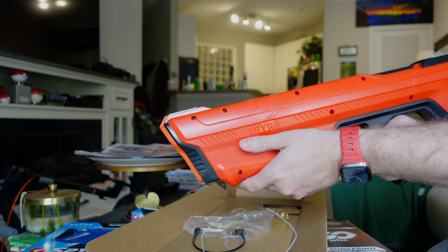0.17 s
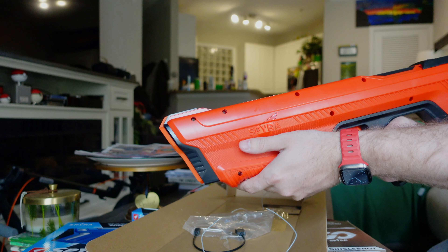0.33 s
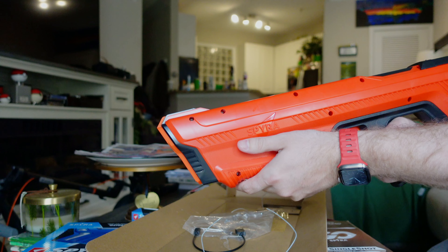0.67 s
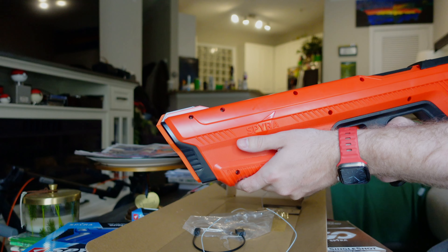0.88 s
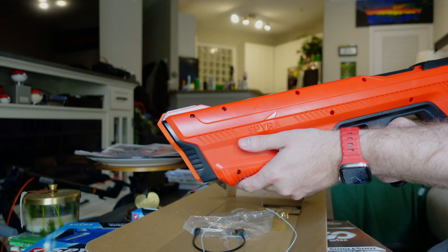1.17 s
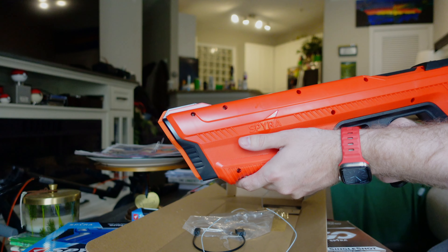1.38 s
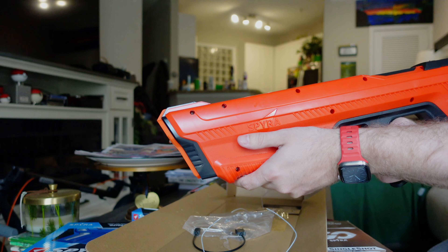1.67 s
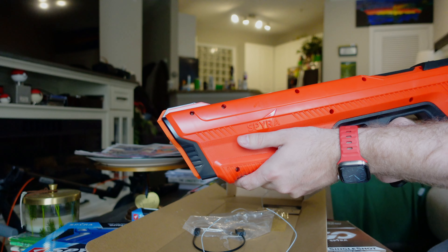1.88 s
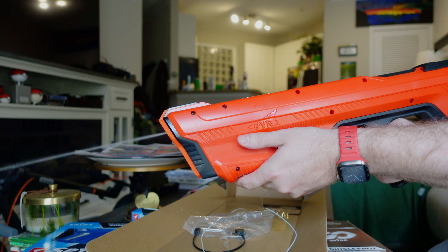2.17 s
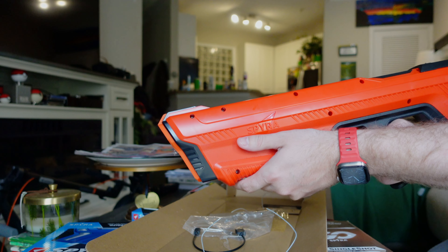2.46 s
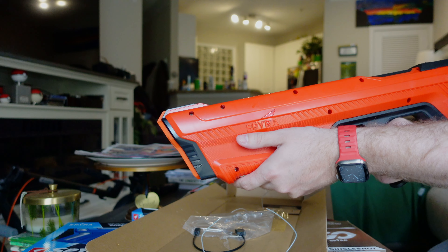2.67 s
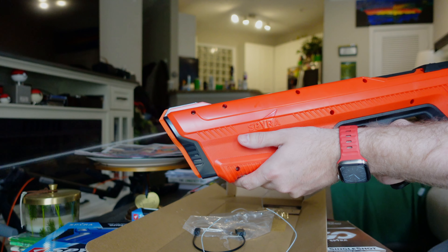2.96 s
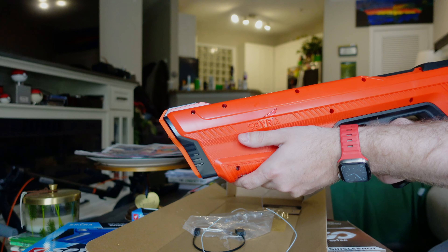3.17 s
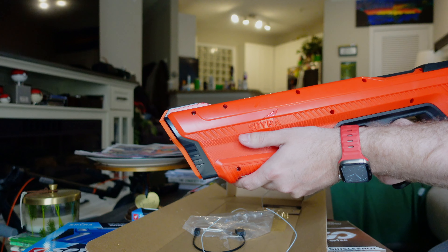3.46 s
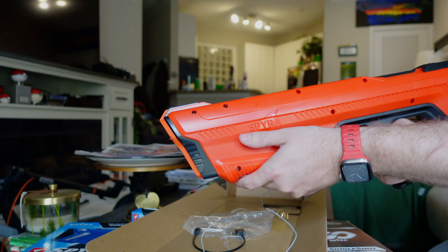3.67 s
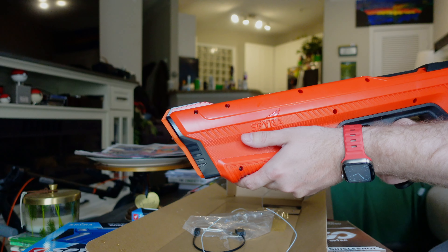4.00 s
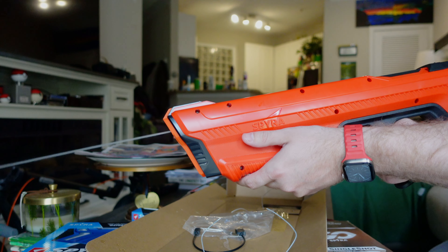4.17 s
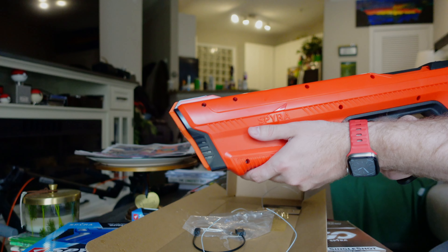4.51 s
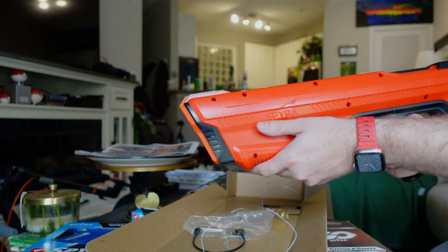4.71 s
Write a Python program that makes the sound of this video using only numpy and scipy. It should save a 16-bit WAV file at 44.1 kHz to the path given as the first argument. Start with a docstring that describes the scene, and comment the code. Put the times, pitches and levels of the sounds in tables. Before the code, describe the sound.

An electric toy water gun fires five separate shots indoors, each a rising motor whir, sharp plastic clack, racing gears and brief water spurt.

```python
"""A thin ring from an earlier shot dies away over still air and mains hum, then a trigger clicks close by.
An electric water gun fires five shots in a living room, near a microphone with a limiter.
Each shot is one turn of a geared cam: the motor winds up against a spring, the valve snaps open, the unloaded
gears race and throb, then take up the load again and stop with a clack.
The jet, a little farther off, hisses and drums on a hollow target: random impacts through filters."""
import sys
import numpy as np
from scipy import signal
from scipy.fft import rfft, irfft, next_fast_len
from scipy.io import wavfile
from scipy.ndimage import uniform_filter1d, minimum_filter1d, map_coordinates

SR = 44100
rng = np.random.default_rng(int(sys.argv[2]) if len(sys.argv) > 2 else 0)


def store_wav(level_fs):
    """Save 16-bit WAV to argv[1]."""
    pcm = np.round(np.clip(np.atleast_2d(level_fs), -1, 1) * 32767)
    wavfile.write(sys.argv[1], SR, pcm.T.astype(np.int16))


N = 213752
RUN_S, RING_S = .594, .3  # one turn of the cam; length of each short knock


def amp(db):
    """Decibels to gain."""
    return 10 ** (np.asarray(db) / 20)


def unit(x):
    """Scale to rms 1."""
    return x / np.sqrt(np.mean(x ** 2) + 1e-20)


def along(points, hz):
    """Read (frequency [Hz], value) points on a log frequency axis."""
    f, v = np.transpose(points)
    return np.interp(np.log(hz + 1), np.log(f), v)


def clock(seconds):
    """Sample times from zero."""
    return np.arange(int(seconds * SR)) / SR


def add(track, s, x):
    """Mix x into the track at s seconds."""
    at = max(0, round(s * SR))
    track[at:at + len(x)] += x[:max(0, len(track) - at)]


def wobble(rate, t):
    """A smooth random curve, rate knots a second."""
    return map_coordinates(rng.standard_normal(int(t[-1] * rate) + 4), [t * rate + 1])


def gate(t, rise, fall):
    """Soft ends for a sound that lasts the times t."""
    return np.clip(t / rise, 0, 1) * np.clip((t[-1] - t) / fall, 0, 1)


def settle(t, s, lag):
    """0 to 1 from s seconds on, as a flywheel follows a new load."""
    return 1 - np.exp(-np.maximum(t - s, 0) / lag)


def ease(t, s, length):
    """A smooth step from 0 to 1 that begins at s seconds."""
    return np.sin(np.pi / 2 * np.clip((t - s) / length, 0, 1)) ** 2


def colour(x, spectrum, peaks=(), size=4096):
    """Causal filter of energy 1: a broad spectrum with resonances standing on it."""
    hz = np.fft.rfftfreq(size, 1 / SR)
    resonances = sum(amp(db) / (1 + (2 * (hz - c) / w) ** 2) for c, w, db in peaks)
    gain = amp(along(spectrum, hz)) * (1 + resonances)
    # folding the cepstrum gives minimum phase, so the response starts at once
    cepstrum = irfft(np.log(gain + 1e-6))
    cepstrum[1:size // 2] *= 2
    cepstrum[size // 2 + 1:] = 0
    response = irfft(np.exp(rfft(cepstrum)))
    return signal.fftconvolve(x, response / np.linalg.norm(response))[:len(x)]


# mains hum: (frequency [Hz], rms level [dB])
HUM = [(120, -65), (179, -58), (299, -57), (420, -69)]
# still air in the place: (frequency [Hz], relative density [dB per Hz])
STILL_AIR = [(25, -15), (100, -13), (200, -9), (400, -6), (800, -12), (1300, -20), (2000, -25), (4000, -32),
             (11000, -38), (16000, -40)]


def background():
    """Still air as filtered noise, and the hum of household appliances as steady sines."""
    t = np.arange(N) / SR
    hum = sum(amp(db) * np.sqrt(2) * np.sin(2 * np.pi * (hz * t + rng.random())) for hz, db in HUM)
    return hum + amp(-50) * unit(colour(rng.standard_normal(N), STILL_AIR))


# decay of the living room: (frequency [Hz], t60 [s])
ROOM = [(150, 0.12), (600, 0.3), (1600, 0.43), (5000, 0.33), (8000, 0.36), (15000, 0.15)]


def room(x):
    """The living room's diffuse answer, a decaying noise tail; the upper middle lingers longest."""
    hz, t, z = signal.stft(rng.standard_normal(int(.7 * SR)), SR, nperseg=256)
    decay = amp(-60 * t / along(ROOM, hz)[:, None])
    tail = signal.istft(z * decay, SR, nperseg=256)[1]
    tail = tail * np.clip(np.arange(len(tail)) / SR / 0.029, 0, 1)  # the tail builds up gradually
    return signal.fftconvolve(x, tail / np.linalg.norm(tail))[:N]


def envelope(shape, t):
    """Gain of a part that waits, rises, holds and dies away."""
    delay, attack, hold, fall_db_per_s, db = shape
    falling_s = np.maximum(t - delay - attack - hold, 0)
    return ease(t, delay, attack) * amp(db - fall_db_per_s * falling_s)


# the parts of a jet, timed from the valve: (delay [s], attack [s], hold [s], fall [dB per s], level [dB])
GUSHING = (.006, .015, .09, 110, -22)
SPITTING = (.004, .016, .016, 220, -10.5)
SPRAYING = (.02, .03, .16, 80, -18)
DRUMMING = (.07, .025, .17, 125, -10)
# gush at the nozzle, first spit, spray, hollow target: (frequency [Hz], relative density [dB per Hz])
GUSH = [(40, -30.5), (200, -13.5), (350, -4.5), (750, 3), (1100, 0), (1600, 0), (3200, -5.5), (4500, -23.5),
        (8000, -32), (15000, -55.5)]
MIST = [(1000, -29.5), (3000, 1), (4500, 1.5), (5900, -8), (7500, 2), (11000, -3), (15000, -5.5),
        (16000, -24)]
SPRAY = [(400, -31), (1200, 8), (2800, 8.5), (4500, -13.5), (8000, -8.5), (11000, -0.5), (15500, -46.5)]
TARGET = [(35, -75.5), (60, -20.5), (254, -3), (328, 4.5), (365, 4), (410, 2.5), (692, 0), (884, 1),
          (967, -9), (1060, 1), (1300, -1.5), (1690, -35.5), (2860, -120)]
# resonances of the target: (frequency [Hz], width [Hz], level over the spectrum [dB])
TARGET_MODES = [(322, 35, 2.5), (423, 59, 1), (627, 22, 0), (782, 38, 8), (924, 30, 4), (1092, 36, 2.5)]


def water(slugs_per_s=450, drops_per_s=6000, spatters_per_s=2600, spurt_db=3.5):
    """Water gushes from the nozzle and breaks up: fine drops hiss, then heavy slugs drum on the target."""
    out, t = np.zeros(N), clock(RUN_S)

    def impacts(rate):
        """Random hits, each of its own force, rate a second on average."""
        return unit((rng.random(len(t)) < rate / SR) * rng.standard_normal(len(t)))

    for s, *_, gush_db, spray_db, drum_db in RELEASES:
        spurts = amp(spurt_db * wobble(139.7, t))  # the jet arrives in clumps
        ripple = amp(1.0 * wobble(450, t))
        gush = amp(gush_db) * unit(colour(impacts(drops_per_s) * spurts * ripple, GUSH))
        spray = amp(spray_db) * unit(colour(impacts(spatters_per_s) * spurts, SPRAY))
        spit = amp(spray_db) * unit(colour(impacts(spatters_per_s) * spurts, MIST))
        blows = impacts(slugs_per_s) + 0.38 * impacts(drops_per_s)
        drum = amp(drum_db) * unit(colour(blows * spurts, TARGET, TARGET_MODES))
        jet = gush * envelope(GUSHING, t) + spit * envelope(SPITTING, t)
        jet += spray * envelope(SPRAYING, t) + drum * envelope(DRUMMING, t)
        add(out, s, jet)
    return out


def snap(spectrum, t60):
    """A short plastic contact, decaying filtered noise with peak 1."""
    t = clock(RING_S)
    x = colour(rng.standard_normal(len(t)) * amp(-60 * t / t60), spectrum)
    return x / np.abs(x).max()


def ring(modes, t, attack):
    """Damped modes (frequency [Hz], level [dB], t60 [s]), at new strengths for each blow."""
    sizes_db = rng.normal(0, 1.5, len(modes))
    wave = 0
    for (hz, db, t60), size_db in zip(modes, sizes_db):
        wave = wave + amp(db + size_db - 60 * t / t60) * np.sin(2 * np.pi * hz * t)
    return wave * (1 - np.exp(-t / attack))


# trigger and latch clicks: (time [s], level before click_db or trigger_db [dB])
CLICKS = [(0.073, -30.5), (0.848, -17.5), (1.132, -21.5), (1.954, -24), (2.804, -20.5), (3.588, -21),
          (4.018, -21)]
# contact noise of a click and of a clack: (frequency [Hz], relative density [dB per Hz])
CLICK = [(200, -35), (600, 2.5), (1200, -5.5), (2000, -8.5), (3300, -13.5), (5000, -24), (9500, -33),
         (15000, -42.5)]
CLACK = [(120, -28.5), (200, -18), (636, 0), (864, -5), (1130, 1.5), (1460, -7), (2750, -6), (6080, -24),
         (9210, -23.5), (15000, -51.5)]
# ringing of the trigger, the gun's body and its water tank: (frequency [Hz], level [dB], t60 [s])
TRIGGER = [(590, 0, .07), (690, -3, .05)]
BODY = [(300, -6, .05), (400, -2, .05), (520, 1, .04), (680, -2, .03)]
TANK = [(101, 0, .26), (112, -6, .2), (170, -9, .2), (305, -4, .2), (335, -4, .2)]
# the cam lets the spring go, once a shot: (time [s], valve clack [dB], thump [dB], tank boom [dB],
# cam catch [dB], gush [dB], spray [dB], drumming [dB]); the water plays from it too
RELEASES = [(.313, 13.5, 6, -20, -9, 2.5, -23, -23), (1.365, 14, 5, -17, 1.5, -1, -19.5, -20),
            (2.164, 6.5, -4, -31, -1, -1.5, -7.5, -8), (3.017, 5.5, -6.5, -34, -9.5, 0.5, -10.5, -4),
            (4.214, 8, -22, -38, 6, -2.5, -12.5, -4)]


def knocks(click_db=2, trigger_db=-17, start_db=-14, jolt_db=-30, stop_db=-7, slip_db=-11, slip_s=0.0061):
    """Trigger clicks, blows of valve and cam, and the low recoil of body and tank as damped modes."""
    out, t = np.zeros(N), clock(RING_S)
    clack = lambda: snap(CLACK, t60=0.033)
    for s, db in CLICKS:
        add(out, s, amp(db + click_db) * snap(CLICK, t60=0.028))
        add(out, s, amp(db + trigger_db) * ring(TRIGGER, t, attack=0.00081))
    for s, *_ in SHOTS:  # the gears knock as they start and stop
        add(out, s - .001, amp(start_db) * clack() + amp(jolt_db) * ring(BODY, t, attack=0.0041))
        add(out, s + RUN_S - .008, amp(stop_db) * clack())
    for s, clack_db, thump_db, boom_db, catch_db, *_ in RELEASES:
        add(out, s - slip_s, amp(clack_db + slip_db) * clack())  # the follower slips off the cam's edge
        add(out, s, amp(clack_db) * clack())
        thump = amp(thump_db) * ring(BODY, t, attack=0.0046)
        boom = amp(boom_db) * ring(TANK, t, attack=0.019)
        add(out, s, thump + boom)
        add(out, s + FREE_S, amp(catch_db) * clack())
    return out


# tooth mesh pitch before each shot's trim: as the motor kicks in, cocking, running free, reloading
KICK_HZ, COCK_HZ, FREE_HZ, RELOAD_HZ = 750, 1555, 1910, 1590
SPIN_UP_S, RACE_S, BRAKE_S, BRAKE_HZ = .021, .03, .04, 35
FREE_S, TAKE_UP_S = .187, .095  # the cam runs free this long, then takes up the spring


def mesh_pitch(t, release):
    """The motor winds up, races once the spring is gone, slows under the next load and brakes."""
    wound_up = KICK_HZ + (COCK_HZ - KICK_HZ) * settle(t, 0, SPIN_UP_S)
    race = (FREE_HZ - COCK_HZ) * settle(t, release, RACE_S)
    slowing = (FREE_HZ - RELOAD_HZ) * ease(t, release + FREE_S, TAKE_UP_S)
    braking = BRAKE_HZ * ease(t, RUN_S - BRAKE_S, BRAKE_S)
    return wound_up + race - slowing - braking


# the gears in each stroke: (whine [dB], overtones [dB], rattle [dB])
COCKING = (-10.5, -19, -14.5)
FREEWHEEL = (-9.5, -39, -13)
RELOADING = (-14, -17, -9.5)
COCK_LOAD, RELOAD_LOAD, LOAD_PER_S = 0.6, 0.51, 1.36  # load on the teeth 0-1; grows as the spring is wound


def strokes(t, release, bite_s=0.03, unseat_s=0.053, chatter_rise_s=0.072, grab_s=.055):
    """Gains of whine, overtones and rattle, and the load, through cocking, freewheeling and reloading."""
    catch = release + FREE_S
    cocking = 1 - ease(t, release - .003, .015)
    reloading, slowed = ease(t, catch, grab_s), ease(t, catch, TAKE_UP_S)
    free = 1 - cocking - reloading
    reload_load = RELOAD_LOAD + LOAD_PER_S * (t - catch)
    load = np.clip(COCK_LOAD * cocking + reload_load * reloading, 0, 1)
    # tones need seated teeth: the whine fades as the cam nears its edge, and builds again in the freewheel
    bite = ease(t, 0, bite_s)
    seated = bite * (1 - ease(t, release - unseat_s, unseat_s))
    racing = ease(t, release, chatter_rise_s) * (1 - slowed)
    early_whine = amp(COCKING[0]) * seated + amp(FREEWHEEL[0]) * racing
    reload_whine = amp(RELOADING[0]) * slowed * np.sqrt(load)
    overtones = amp(COCKING[1]) * cocking * bite + amp(FREEWHEEL[1]) * free
    overtones += amp(RELOADING[1]) * slowed ** 2
    clatter = amp(COCKING[2]) * cocking + amp(FREEWHEEL[2]) * free + amp(RELOADING[2]) * reloading
    return (early_whine, reload_whine), overtones, clatter, load


PINION_TEETH, WHEEL_TEETH = 10, 34


def contact(teeth, t, release, burst_db, slip):
    """Slack teeth catch and fly free once a wheel turn, each time with their own force and speed."""
    depth = ease(t, release, .05) * (1 - ease(t, release + FREE_S, .02))
    turns = teeth / WHEEL_TEETH + rng.random()
    draws = rng.standard_normal((int(turns[-1]) + 1, 2))  # one force and one speed a turn
    size, shift = draws[turns.astype(int)].T
    burst = np.clip(.5 - 2 * np.cos(2 * np.pi * turns), 0, 1) * amp(burst_db * size)
    lead = np.cumsum(slip * shift * depth * np.gradient(teeth))  # in teeth, ahead of the motor
    return 1 - depth + depth * burst, lead


# gear noise of the loaded housing and of unloaded gears: (frequency [Hz], relative density [dB per Hz])
HOUSING = [(120, -44), (200, -56.5), (440, -19), (473, -47), (519, -16), (851, -10.5), (1650, -1.5),
           (1810, -4), (2860, -6), (3190, -2), (4120, -10), (4770, -10.5), (7270, -29.5), (12600, -16.5),
           (16000, -65)]
SLACK = [(150, -34.5), (300, -37), (600, -8.5), (1200, -5), (2000, -1.5), (2800, -4), (3800, -6.5),
         (4800, -21), (6000, -19.5), (8500, -21.5), (12000, -48.5), (16000, -27)]
# plastic resonances: (frequency [Hz], width [Hz], level over the spectrum [dB])
SHELL = [(1260, 440, 2), (2054, 110, 8), (3300, 83, -16), (6190, 1800, 10), (12700, 300, -20)]


def rattle(teeth, load, t, scatter_db, rub):
    """Each tooth strikes with its own force and rubs; load presses the bright housing into the noise."""
    hits = np.diff(np.floor(teeth), prepend=0) * rng.standard_normal(len(t))

    def drive():
        """Tooth hits and rubbing noise, scattered in level."""
        return (unit(hits) + rub * rng.standard_normal(len(t))) * amp(scatter_db * wobble(500, t))

    share = np.clip(load, 0, 1)
    return share * unit(colour(drive(), HOUSING, SHELL)) + (1 - share) * unit(colour(drive(), SLACK))


# whine overtones: (multiple of the tooth mesh, level [dB])
OVERTONES = [(2, 0), (3, -3), (4, -13), (7, -20), (8, -22.5)]
# motor orders: (multiple of the motor shaft, level [dB])
SHAFT = [(7, -22.5), (9, -22), (11, -38.5), (13, -22.5), (17, -22), (23, -25.5), (33, -34), (36, -36.5),
         (56, -49), (70, -48.5)]


def gearbox(release, trim, chatter_db, reload_db, play=0.024, slack_play=0.062, flutter_db=2.5,
            commutator_db=-27, shaken=0.42):
    """One turn of the cam: tooth whine, motor orders and rattle, all tied to the shaft."""
    t = clock(RUN_S)
    (early_whine, reload_whine), overtone_gain, rattle_gain, load = strokes(t, release)
    teeth = np.cumsum(mesh_pitch(t, release) * (1 + trim / 100)) / SR
    # between valve release and reloading, the gears run slack
    free = ease(t, release, .02) * (1 - ease(t, release + FREE_S + .07, .06))
    grip, slip = contact(teeth, t, release, burst_db=2, slip=.022)
    # backlash, in teeth, is widest while the spring is off the cam
    backlash = play * wobble(70, t) + (.013 + slack_play * free) * wobble(350, t)
    mesh = teeth + slip + backlash

    def partial(cycles):
        """A sine with fluttering level."""
        tone = np.sqrt(2) * np.sin(2 * np.pi * (cycles + rng.random()))
        return tone * unit(amp(flutter_db * wobble(128.3, t)))

    whine = (early_whine * amp(chatter_db * free) + reload_whine * amp(reload_db)) * partial(mesh)
    whine += overtone_gain * sum(amp(db) * partial(k * mesh) for k, db in OVERTONES)
    shaft = teeth / PINION_TEETH
    motor = load * sum(amp(db) * partial(k * shaft) for k, db in SHAFT)
    poles = partial(3 * shaft)  # the three-pole armature
    hum = amp(commutator_db) * np.clip(t / 0.24, 0, 1) * poles
    clatter = rattle_gain * rattle(teeth, load, t, scatter_db=2.5, rub=0.96)
    clatter = clatter * (1 + shaken * (grip - 1))
    return (whine * grip + motor + hum + clatter) * gate(t, rise=.009, fall=.008)


# one turn of the cam: (motor start [s], motor level [dB], speed trim [%], chatter [dB], reloading whine [dB]);
# the knocks take their start times from it too
SHOTS = [(.196, -1.5, 0.19, 1.5, 1), (1.251, -3, 0.033, 0.5, -3), (2.052, -2.8, -.4, -1.5, -5),
         (2.900, -3, -.3, -6, -8), (4.093, -4, 0.54, -9.5, 1)]


def shots(switch_db=-31, ringing_db=-35, stop_ring_db=-28):
    """The switch ticks, the gearbox runs once and leaves a thin ring; an earlier shot still rings at the start."""
    out, t = np.zeros(N), clock(RING_S)
    tone = np.sin(2 * np.pi * 1575 * t)
    fading = amp(-60 * t / 0.42)
    for (s, db, trim, chatter_db, reload_db), (opens, *_) in zip(SHOTS, RELEASES):
        add(out, s - .02, amp(switch_db) * snap(CLICK, t60=.08))
        add(out, s, amp(db) * gearbox(opens - s, trim, chatter_db, reload_db))
        add(out, s + RUN_S, amp(stop_ring_db) * fading * tone)
    housing = unit(colour(rng.standard_normal(len(t)), HOUSING, SHELL))
    earlier = amp(-38.5) * housing + amp(ringing_db) * tone
    add(out, 0, amp(-60 * t / 0.31) * earlier)
    return out


def scene():
    """The gun near the microphone, the water a little farther off with more of the room in it."""
    gun, splash = shots() + knocks(), water()
    direct = amp(3.0) * gun + amp(1.5) * splash
    reverberant = room(amp(-7.5) * gun + amp(1.5) * splash)
    return (direct + reverberant + background())[None]


TOP_HZ = 15900  # band limit


def record(dry, ceiling=0.82, release_s=0.06):
    """A limiter catches each peak and recovers slowly; nothing is kept above the band limit."""
    need = np.minimum(1, ceiling / (np.abs(dry) + 1e-9))
    fast = uniform_filter1d(minimum_filter1d(need, size=131), size=131)
    held = minimum_filter1d(need, size=661, origin=330)  # lowest gain of the last 15 ms
    pole = np.exp(-1 / (release_s * SR))
    slow = 1 - signal.lfilter([1 - pole], [1, -pole], 1 - held)
    limited = dry * np.minimum(fast, slow)
    m = next_fast_len(N + SR // 2)
    passed = np.clip((TOP_HZ - np.fft.rfftfreq(m, 1 / SR)) / 200, 0, 1)  # 200 Hz slope
    return irfft(rfft(limited, m) * passed, m)[..., :N]


dry = scene()
out = record(dry)
store_wav(out)
```